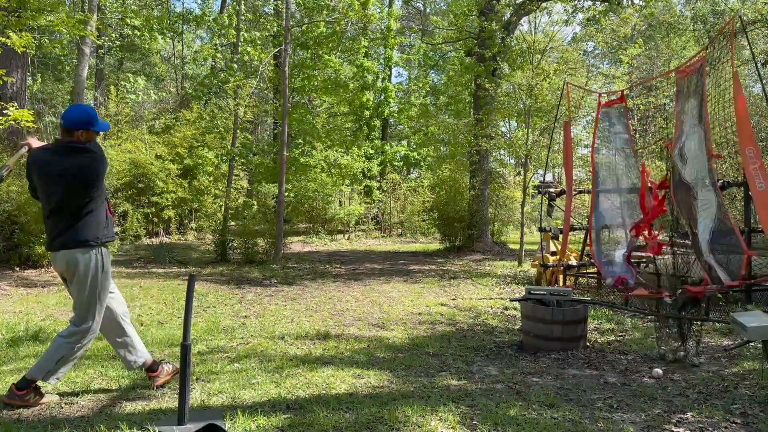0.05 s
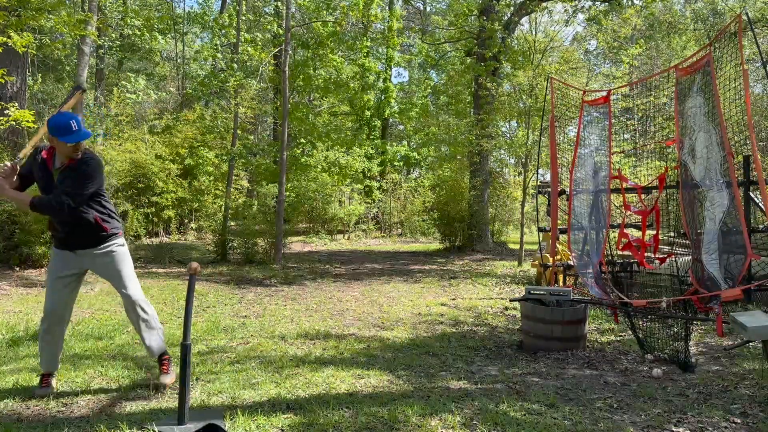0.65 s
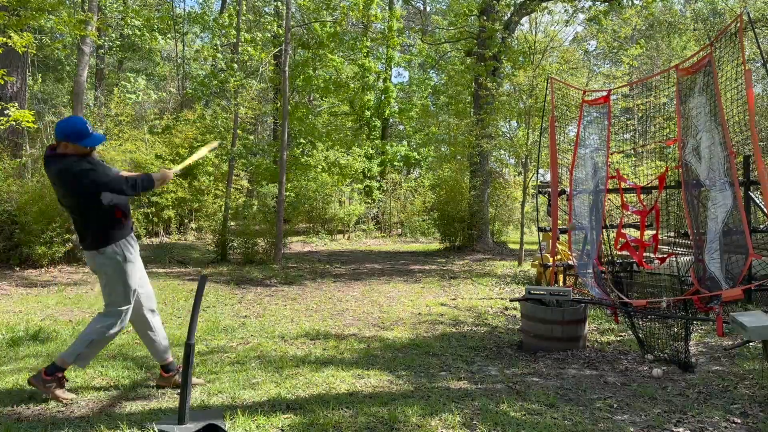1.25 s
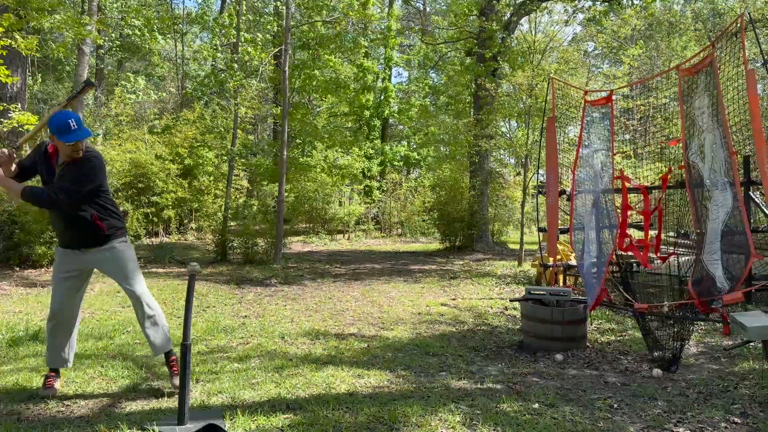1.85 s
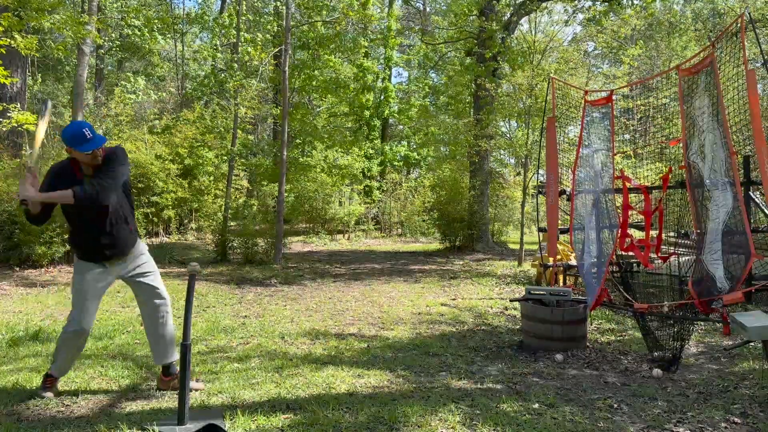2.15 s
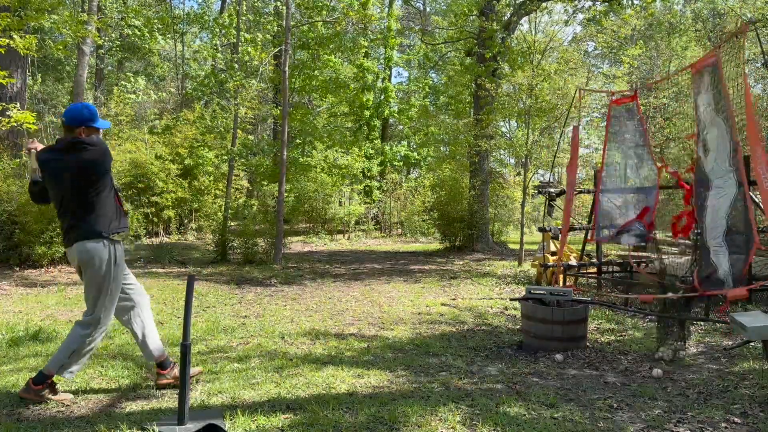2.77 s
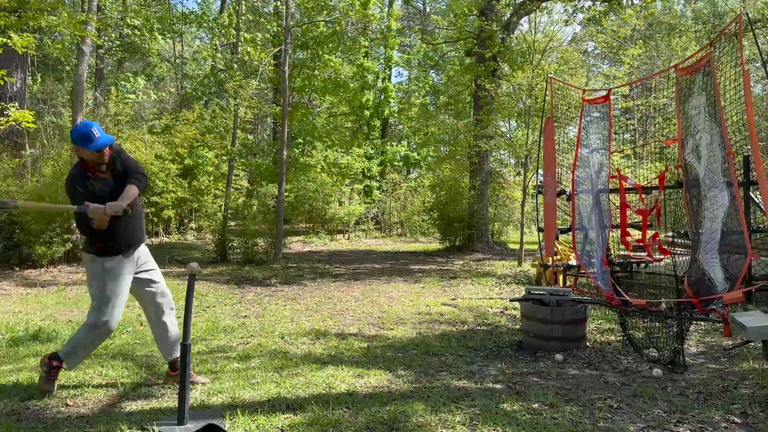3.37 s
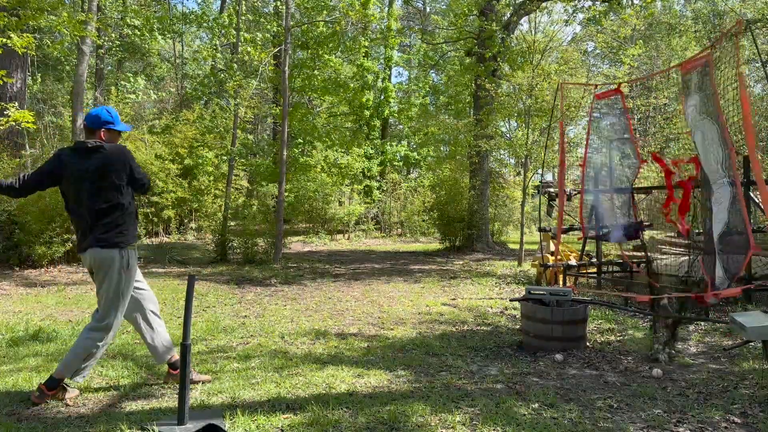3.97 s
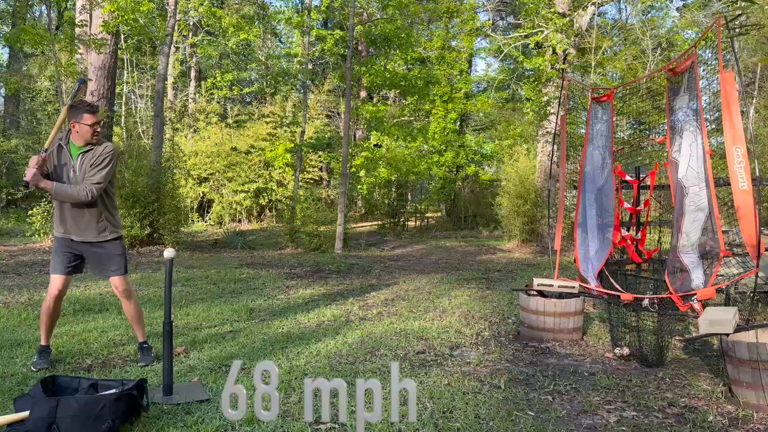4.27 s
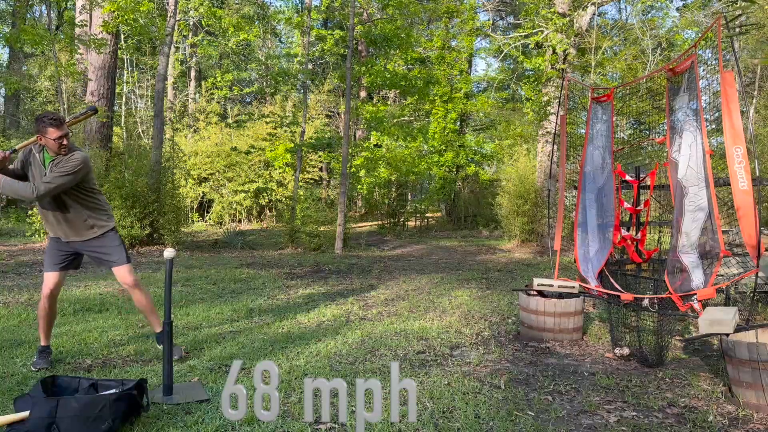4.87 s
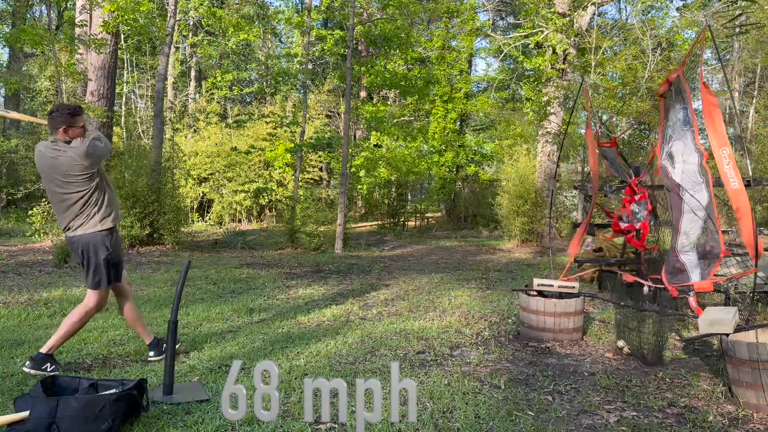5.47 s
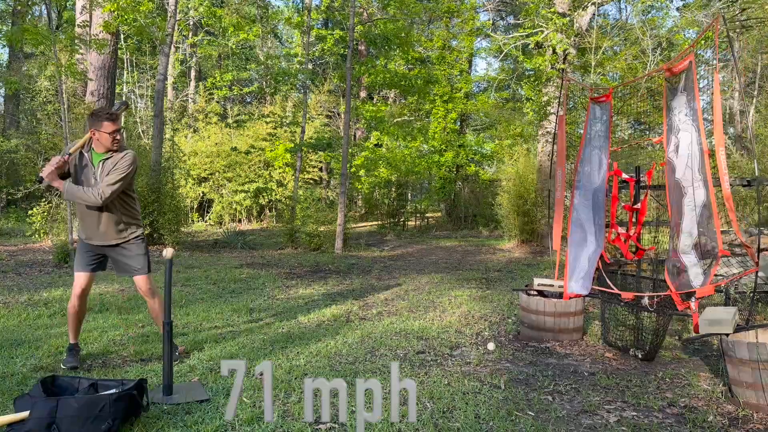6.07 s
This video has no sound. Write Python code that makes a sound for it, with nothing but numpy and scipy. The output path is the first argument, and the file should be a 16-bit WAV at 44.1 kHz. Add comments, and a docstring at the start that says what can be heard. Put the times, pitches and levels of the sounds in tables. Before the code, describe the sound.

Four sharp cracks of bat on baseball echo among trees, each followed by a net thudding, billowing and clattering.

```python
"""A practice net flaps and rattles, then a bat cracks four baseballs off a tee into it. Each hit is a click,
the knock of the squashed ball and a short ring of the bat, thrown back by lawn, trunks and leaves. The net
snaps tight, thuds and billows, and its frame clatters. Underneath are the batter's movements and a light
breeze. From about 4.2 seconds the scene changes: the echoes differ, the net's cloth hums, the low rumble
beneath is louder and a small bird whistles."""
import sys
import numpy as np
from scipy import signal
from scipy.fft import rfft, irfft, next_fast_len
from scipy.io import wavfile
from scipy.ndimage import map_coordinates

SR = 44100
rng = np.random.default_rng(int(sys.argv[2]) if len(sys.argv) > 2 else 0)


def persist_wave(psi):
    """Save psi, clipped to +-1, as 16-bit WAV."""
    counts = np.round(np.clip(psi, -1, 1) * 32767).astype(np.int16)
    wavfile.write(sys.argv[1], SR, np.atleast_2d(counts).T)


N = 274302
CHANGE_S, TREBLE_DROP_S = 4.206, 5.925  # when echoes, cloth and rumble change; when the background's treble drops

# Bat meets ball. Each row: start in seconds, click level in dB, click tilt in dB per octave, knock level
# in dB, knock tilt in dB per octave, ring level in dB, ring pitch multiplier, echo level in dB, extra
# bite in dB, band sent toward the trees in Hz, its boost in dB. Levels in all tables are relative.
HITS = [(1.1853, -4.5, 7, -3, 3.5, -4.5, 0.92, 2.5, -0.5, 2410, 6),
        (2.3091, -3.5, 4.5, -1.5, 2.5, -3, 0.96, 3.5, 1, 1885, -0.5),
        (3.4556, -5, 4, 0.5, 2, -6.5, 0.95, 2, 1.4, 1970, 6),
        (5.2886, -9, 13.5, -6.5, -1.3, -1, 0.87, 2.5, 12.5, 2000, -5)]
# The tone of the click and of the knock. Each row: frequency in Hz, level in dB.
CLICK_TONE = [(500, -29), (2500, -13), (4500, -0.5), (6300, -6.5), (8800, 5), (11000, -1), (13000, -4.5),
              (16000, -16)]
KNOCK_TONE = [(100, -35.5), (250, -15.5), (430, 3.5), (750, -3.5), (1000, 3.5), (1400, -8), (2000, -14.5),
              (2500, -17.5), (3200, -18), (4200, -24), (7500, -23.5), (16000, -57.5)]
# The notes the bat rings with. Each row: pitch in Hz, level in dB, fade time in seconds.
BAT_NOTES = [(914, -10.5, 0.018), (1214, -34, 0.037), (1746, -27, 0.038), (1920, -37.5, 0.074),
             (2630, -32, 0.046), (3060, -25.5, 0.0092), (3520, -34, 0.018)]
# Knock and ring lean to the left. Each row: frequency in Hz, how much louder the left is in dB.
KNOCK_LEAN = [(400, -0.5), (900, 8.5), (4000, 18.5)]
def bat_cracks(size=32768, click_db=9, knock_db=21.5, foliage_db=-34, squash_s=0.00072, lawn_s=0.00151):
    """The contact clicks, the squashed ball knocks and the bat rings; lawn and woods repeat it."""
    out = np.zeros((2, N))
    t, hz = np.arange(size) / SR, np.fft.rfftfreq(size, 1 / SR)
    # The knock reaches the left side first, the click the right side.
    knock_sides = delay(hz, np.array([[0], [4 / SR]])) * amp(curve(KNOCK_LEAN, hz) * [[.5], [-.5]])
    click_sides = delay(hz, np.array([[3.6 / SR], [0]])) * pan(0.88)
    click_octaves = np.log2(np.clip(hz / 9000, .5, 2))
    knock_octaves = np.log2(np.clip(hz / 800, .5, 5))
    lawn = 1 + .85 * delay(hz, lawn_s) / (1 + (hz / 2600) ** 2)  # grass returns only the lower part
    early_trunks, late_trunks = trunk_echoes(EARLY_TRUNKS, size), trunk_echoes(LATE_TRUNKS, size)
    fade_out = np.minimum(1, 20 * (t[-1] - t))
    for (start, click_level, click_tilt, knock_level, knock_tilt, ring_db, ring_pitch,
         echo_db, bite_db, beam_hz, beam_db) in HITS:
        click = amp(click_db + click_level) * pulse(curve(CLICK_TONE, hz) + click_tilt * click_octaves)
        knock = amp(knock_db + knock_level) * pulse(curve(KNOCK_TONE, hz) + knock_tilt * knock_octaves)
        ring = sum(amp(ring_db + db + rng.normal(0, 1)) * note(t, ring_pitch * pitch, fade_s)
                   for pitch, db, fade_s in BAT_NOTES)
        body = (knock * lawn + rfft(ring)) * delay(hz, squash_s)
        direct = body * knock_sides + click * click_sides
        trunks = early_trunks if start < CHANGE_S else late_trunks
        echoes = (body + click) * trunks + amp(foliage_db) * rfft(foliage(size))
        # The bat beams one band toward the trees, depending on where the ball meets it.
        beam = pulse(echo_db + beam_db * band(hz, beam_hz, octaves=0.45))
        bite = pulse(bite_db * band(hz, 5700, octaves=0.73))  # the edge of a hard contact
        add(out, start, irfft(direct * bite + beam * echoes) * fade_out)
    return out


# Trunks and yard gear that echo a crack, before and after CHANGE_S. Each row: delay in seconds,
# level in dB, how much louder the left is in dB, the frequency returned best in Hz.
EARLY_TRUNKS = [(.0045, -19, -2, 900), (0.0142, -17.5, 1, 2290), (0.0172, -19.5, -3, 2400),
                (0.025, -23, -4, 1000), (0.0332, -19, 4.5, 4800), (.0585, -25, -3, 2600),
                (.0598, -23, 3, 4900), (.0893, -20.5, 0, 2000)]
LATE_TRUNKS = [(.0055, -13, -6, 950), (.0105, -15, 4, 950), (.0125, -13, 4, 5140), (.0155, -11.5, 1, 2800),
               (.0565, -17, -3, 2800), (.09, -20, 0, 2400)]
# The tone all these echoes share. Each row: frequency in Hz, level in dB.
ECHO_TONE = [(200, -19), (600, -8.5), (900, 0), (1300, -0.5), (2200, 4), (3500, 1.5), (5000, 8),
             (7000, -21), (16000, -29.5)]
def trunk_echoes(trunks, size, smear_s=0.0008, roughness=0.85, lead_s_per_db=5e-5):
    """Each trunk returns a slap, smeared by rough bark, that reaches the louder side first."""
    t, hz = np.arange(size) / SR, np.fft.rfftfreq(size, 1 / SR)
    echoes = 0
    for delay_s, db, left_db, best_hz in trunks:
        smear = rng.standard_normal(size) * np.exp(-t / smear_s)
        slap = (1 + roughness * rfft(smear / np.linalg.norm(smear))) / np.hypot(1, roughness)
        colour = pulse(9 * (band(hz, best_hz, octaves=0.37) - .5))
        arrival_s = delay_s + lead_s_per_db * left_db * np.array([[-.5], [.5]])
        echoes += amp(db) * slap * colour * delay(hz, arrival_s) * pan(left_db)
    return echoes * amp(curve(ECHO_TONE, hz))


# The tone of a crack scattered by leaves. Each row: frequency in Hz, level in dB.
FOLIAGE_TONE = [(100, 10), (420, -1.5), (900, -2), (1400, -1.5), (2200, -1.5), (3600, -8.5), (4900, -7.5),
                (6500, -11.5), (9500, -6.5), (12000, -18), (16000, -26.5)]
# How long it lingers. Each row: frequency in Hz, fade time in seconds.
FOLIAGE_FADE = [(200, 0.29), (1000, 0.78), (3000, 0.78), (9000, 0.31), (15000, 0.7)]
def foliage(size, rise_s=0.00047):
    """Countless leaves and twigs scatter a crack into a grainy tail."""
    likeness = [(300, 0.54), (1200, 0.1), (5000, 0.1), (9000, 0.41)]
    scatter = noise(FOLIAGE_TONE, grain_db=3, likeness=likeness)[:, :size]
    hz, t, bands = signal.stft(scatter, SR, nperseg=256)
    envelope = (1 - np.exp(-t / rise_s)) * fade(t, curve(FOLIAGE_FADE, hz)[:, None])
    return signal.istft(bands * envelope, SR, nperseg=256)[1][:, :size]


# The ball lands in the net. Each row: start in seconds, levels in dB of snap, slap, hiss, rustle and
# thud, the thud's delay in seconds, its first pitch in Hz, its rise and glide times in seconds.
CATCHES = [(1.2952, -20.5, -26, -31.5, -54, -18, .0071, 100, .0114, .034),
           (2.428, -18.5, -23.5, -32.5, -48, -17, .0011, 185, .0122, .026),
           (3.5796, -22, -24.5, -32.5, -56, -18.5, .0093, 182, .0065, .0205),
           (5.4129, -23, -27, -33.5, -47.5, -14.5, .0081, 180, .0048, .0075)]
# The tone of the snapping net, slapped cloth and rubbing cords. Each row: frequency in Hz, level in dB.
SNAP_TONE = [(150, -2), (600, 7), (1600, 4), (3000, 2), (6500, -15), (9500, 1.5), (12000, -8),
             (16000, -20.5)]
SLAP_TONE = [(80, 8), (200, 13.5), (400, 1), (800, -2), (1500, -7), (2500, -12), (5000, -17), (9000, -68)]
MESH_TONE = [(1000, 9), (3000, 1.5), (4900, 1.5), (6800, -2), (8300, -2.5), (9500, 6.5), (10600, 3.5),
             (12000, -8), (16000, -10)]
def net_catches(slap_lag_s=0.0046, sag_hz=43.8):
    """The ball snaps the net tight and slaps its cloth; cords zip, and a thud sinks as the net gives."""
    snap, slap, hiss = np.zeros((3, N))
    thud = np.zeros((2, N))
    for start, snap_db, slap_db, hiss_db, _, thud_db, lag_s, thud_hz, rise_s, glide_s in CATCHES:
        snap += amp(snap_db) * burst(start, rise_s=0.00075, fade_s=0.038)
        slap += amp(slap_db) * burst(start + slap_lag_s, rise_s=0.00085, fade_s=0.24)
        hiss += amp(hiss_db) * burst(start, rise_s=0.00055, fade_s=0.26)
        add(thud, start + lag_s, air_push(thud_db, sag_hz, rise_s, thud_hz / sag_hz, glide_s))
    return (thud + snap * noise(SNAP_TONE, grain_db=2.5)
            + slap * noise(SLAP_TONE, grain_db=1.5) * pan(0.44)
            + hiss * noise(MESH_TONE, grain_db=1.5) * pan(2.6))


def air_push(db, end_hz, rise_s, start_ratio=1, glide_s=0.011):
    """A push of air is a few low waves; a start_ratio above 1 makes the pitch sink as motion slows."""
    t = np.arange(SR // 4) / SR
    pitch = end_hz * (1 + (start_ratio - 1) * np.exp(-t / glide_s))
    swell = (t / rise_s * np.exp(1 - t / rise_s)) ** 1.5
    return amp(db) * swell * sine(pitch) * pan(2.7)


# The net swings out and back. Each row: start and hold time in seconds, cloth and frame levels in dB.
BILLOWS = [(0.0, 0.0057, -28, -39), (0.115, 0.037, -42.5, -51), (1.345, 0.028, -31.5, -36.5),
           (1.49, 0.13, -41.5, -50.5), (2.465, 0.013, -27, -34), (2.508, 0.089, -39.5, -49),
           (2.649, 0.058, -32.5, -44), (3.637, 0.068, -32.5, -44), (3.794, 0.064, -30.5, -39.5),
           (3.917, 0.12, -55.5, -61.5), (4.138, 0.057, -46.5, -64), (5.471, 0.039, -36, -48),
           (5.676, 0.032, -34, -50), (5.782, 0.1, -43, -64)]
# The tone of loose cloth, tight cloth and the net's frame. Each row: frequency in Hz, level in dB.
LOOSE_CLOTH_TONE = [(53, -5), (90, -7.5), (108, -9.5), (167, 3.5), (222, 1), (275, -4.5), (330, -4.5),
                    (468, -11.5), (570, -30), (700, -15), (910, -28), (1540, -120)]
TIGHT_CLOTH_TONE = [(50, -40), (120, -13), (190, 11), (280, -4), (400, -12.5), (800, -61)]
FRAME_TONE = [(300, 5), (500, 7.5), (850, 6), (1300, 0.5), (2000, -2.5), (3000, -17), (5000, -27.5)]
def net_billows(hum_hz=200):
    """Cloth flutters, the frame chatters and the mesh rustles; from CHANGE_S tighter cloth hums."""
    flapping = sum(amp(db) * billow(start, hold_s, fade_s=0.39) for start, hold_s, db, _ in BILLOWS)
    shaking = sum(amp(db) * billow(start, hold_s, fade_s=0.34) for start, hold_s, _, db in BILLOWS)
    settling = sum(amp(db) * billow(start, 0, fade_s=1.27) for start, _, _, _, db, *_ in CATCHES)
    loose = noise(LOOSE_CLOTH_TONE)
    hum = sine(hum_hz * (1 + 0.0293 * wobble(23)))
    tight = unit(noise(TIGHT_CLOTH_TONE) + amp(-1) * hum)
    cloth = flapping * np.where(clock() < CHANGE_S, loose, tight) * pan(2.3)
    frame = amp(-3) * shaking * noise(FRAME_TONE, grain_db=2) * pan(-1.7)
    rubbing = amp(-44) * np.sqrt(flapping) + amp(-3) * settling
    rustle = amp(1.6 * wobble(60)) * noise(MESH_TONE, grain_db=-1)
    mesh = rubbing * (rustle + amp(-9) * cord_clicks()) * pan(1)
    return cloth + frame + mesh


def billow(start, hold_s, fade_s, rise_s=0.004):
    """The loudness of one swing of the net: it fills, holds and dies away."""
    out, t = np.zeros((1, N)), clock()
    envelope = (1 - np.exp(-t / rise_s)) * fade(np.maximum(t - hold_s, 0), fade_s)
    add(out, start, envelope[None])
    return out[0]


# The tone of clicking cords. Each row: frequency in Hz, level in dB.
CORD_TONE = [(700, -14), (1500, 9), (3000, -5), (4800, -8), (7000, -5), (10000, -4), (13000, -2),
             (16000, -15)]
def cord_clicks(count=500, spread_db=5, fade_s=0.012):
    """Cords and clips click against each other at random moments."""
    moments = rng.uniform(0, N - 1, count).astype(int)
    strengths = amp(spread_db * rng.standard_normal(count).clip(-2, 2))
    one_click = fade(np.arange(SR // 10) / SR, fade_s)
    clicks = signal.fftconvolve(np.bincount(moments, strengths, N), one_click)[:N]
    return unit(clicks * noise(CORD_TONE))


# Knocks of the frame. Each row: start in seconds, knock level in dB, ring level in dB, ring pitch in Hz.
RATTLES = [(0.128, -54, -48, 780), (0.137, -41.5, -33, 428), (1.372, -35, -29, 405), (1.536, -45, -46, 783),
           (1.592, -40.5, -43, 835), (2.465, -28, -27, 1090), (2.483, -31, -41, 640),
           (2.569, -34.5, -30, 442), (2.636, -33, -39, 807), (2.664, -27, -31, 919),
           (3.654, -31.5, -39, 1010), (3.791, -34.5, -38, 937), (3.822, -29.5, -44, 495),
           (5.435, -34, -37, 773), (5.478, -42, -54, 820), (5.488, -29.5, -40, 450), (5.497, -43, -39, 420),
           (5.515, -52, -42, 2870), (5.56, -43.5, -52, 970), (5.683, -49, -40, 793),
           (5.77, -44.5, -56, 700)]
# The notes of a fitting. Each row: multiple of the ring pitch, level in dB, fade time in seconds.
FITTING_NOTES = [(1, -3, 0.096), (1.62, -14.5, 0.041)]
# Ticks of twigs and cords. Each row: start in seconds, level in dB.
TICKS = [(2.188, -37), (2.218, -37.5), (2.569, -24.5), (3.347, -30), (5.614, -31)]
def clatter(knock_db=-1, tick_db=-10):
    """The frame knocks hollowly and its fittings ring; twigs and cords give dry ticks."""
    rings, t = np.zeros((2, N)), np.arange(SR // 4) / SR
    for start, _, ring_db, hz in RATTLES:
        ring = sum(amp(ring_db + db) * note(t, ratio * hz, fade_s) for ratio, db, fade_s in FITTING_NOTES)
        add(rings, start, ring[None])
    knocks = sum(amp(db + knock_db) * burst(start, 0.0005, fade_s=0.064) for start, db, *_ in RATTLES)
    ticks = sum(amp(db + tick_db) * burst(start, 0.00093, fade_s=0.019) for start, db in TICKS)
    return knocks * noise(FRAME_TONE) + rings + ticks * noise(MESH_TONE)


# The bat sweeps past just before a hit. Each row: start in seconds, push and whoosh levels in dB.
SWINGS = [(1.152, -33, -43.5), (2.281, -28.5, -47), (3.428, -27, -40), (5.26, -40, -45.5)]
# The tone of the whoosh. Each row: frequency in Hz, level in dB.
WHOOSH_TONE = [(80, 0), (180, -6), (400, -8), (700, -7.5), (1500, -20.5), (4000, -36)]
def bat_swings(peak_s=0.022, width_s=0.016):
    """The bat shoves and stirs the air on its way to the ball."""
    pushes, whoosh = np.zeros((2, N)), np.zeros(N)
    for start, push_db, whoosh_db in SWINGS:
        add(pushes, start, air_push(push_db, end_hz=72, rise_s=0.021))
        whoosh += amp(whoosh_db) * np.exp(-((clock() - start - peak_s) / width_s) ** 2)
    return pushes + whoosh * noise(WHOOSH_TONE) * pan(2.2)


# The batter's steps. Each row: start in seconds, level in dB.
STEPS = [(3.271, -33.5), (4.011, -29.5)]
def footsteps():
    """A foot lands on the lawn with a low thud."""
    out = np.zeros((2, N))
    for start, db in STEPS:
        add(out, start, air_push(db, end_hz=54.6, rise_s=0.011, start_ratio=1.67))
    return out


# The tone of rustling clothes. Each row: frequency in Hz, level in dB.
CLOTHES_TONE = [(1500, 4.5), (4000, -1.5), (7000, -3), (10000, -0.5), (15000, -9.5)]
def clothes_rustle(level_db=-61, wind_up_s=0.17, flick_db=2):
    """The batter's clothes rustle in little flicks, most of all as he turns into the ball."""
    effort = sum(np.exp(-np.abs(clock() - start) / wind_up_s) for start, *_ in HITS)
    return amp(level_db + flick_db * wobble(76)) * effort * noise(CLOTHES_TONE, grain_db=1.5)


# Cords, straps and shoes scrape. Each row: start in seconds, length in seconds, level in dB.
SCRAPES = [(1.568, 0.015, -59.5), (2.083, 0.11, -64), (2.619, 0.02, -52.5), (2.676, 0.031, -52.5),
           (2.721, 0.023, -53), (3.957, 0.043, -55), (4.027, 0.065, -60.5), (5.052, 0.28, -71)]
# The tone of a scrape. Each row: frequency in Hz, level in dB.
SCRAPE_TONE = [(2500, -12), (4800, 0.5), (6800, 7), (8300, 0), (10000, 10), (13000, -9), (16000, -3)]
def scrapes():
    """Each scrape is many tiny slips, swelling and fading."""
    strokes = sum(amp(db) * np.sin(np.pi * np.clip((clock() - start) / length, 0, 1))
                  for start, length, db in SCRAPES)
    return strokes * noise(SCRAPE_TONE, grain_db=3.5)


# A small bird's calls. Each row: start and length in seconds, first and last pitch in Hz, level in dB.
WHISTLES = [(4.28, 0.052, 9700, 7600, -71), (4.746, 0.12, 9240, 7540, -65.5),
            (4.934, 0.043, 8640, 7350, -61), (6.188, 0.055, 8250, 7630, -71)]
def bird(echo_db=-4, fade_s=0.39, waver=0.004):
    """Thin whistles drop fast, level off and linger among the trees."""
    out = np.zeros((2, N))
    for start, length, first_hz, last_hz, db in WHISTLES:
        progress = np.linspace(0, 1, round(length * SR))
        pitch = last_hz + (first_hz - last_hz) * (1 - progress) ** 1.7
        pitch *= 1 + waver * wobble(402)[:len(progress)]
        add(out, start, amp(db) * np.sin(np.pi * progress ** 1.44) * sine(pitch) * pan(0))
    tail = rng.standard_normal((2, SR // 2)) * fade(np.arange(SR // 2) / SR, fade_s)
    echo = signal.fftconvolve(out, tail / np.linalg.norm(tail[0]), axes=1)[:, :N]
    return out + amp(echo_db) * echo


# The tone of the background before and after CHANGE_S. Each row: frequency in Hz, level in dB.
EARLY_AIR_TONE = [(15, -49.5), (25, -21.5), (40, -16.5), (63, -4.5), (153, -15), (249, -20.5), (277, -20),
                  (326, -21.5), (405, -21), (503, -20), (1480, -31.5), (2350, -36), (5430, -45.5),
                  (9570, -45.5), (16000, -58)]
LATE_AIR_TONE = [(15, -54), (25, -46), (52, -5), (76, -3), (114, -7), (141, -19), (293, -27), (317, -32),
                 (405, -28), (714, -30.5), (1130, -37), (1520, -38), (1790, -41), (5880, -46), (16000, -73)]
# How wide it sounds. Each row: frequency in Hz, how alike left and right are (1 means the same).
AIR_LIKENESS = [(60, 1), (180, 0.91), (550, 0.13), (1650, 0.058), (4970, -0.078), (15000, 0.67)]
def rumble_and_breeze(early_db=-55, late_db=-46.5, drop_db=-5):
    """A distant rumble, louder from CHANGE_S, and a breeze in the leaves whose treble drops around 5 kHz from
    TREBLE_DROP_S."""
    early = amp(early_db) * noise(EARLY_AIR_TONE, likeness=AIR_LIKENESS)
    late = amp(late_db) * noise(LATE_AIR_TONE, likeness=AIR_LIKENESS)
    duller = filtered(late, lambda hz: amp(drop_db * band(hz, 5000, octaves=1)))
    late = np.where(clock() < TREBLE_DROP_S, late, duller)
    blend = np.clip((clock() - CHANGE_S) / .01, 0, 1)
    return ((1 - blend) * early + blend * late) * amp(0.59 * wobble(2.9)) * pan(1.4)


# How wide nearby noises sound. Each row: frequency in Hz, how alike left and right are.
NEAR_LIKENESS = [(300, 0.96), (650, 0.38), (1500, 0.12), (4000, 0.045), (9000, 0.82)]
def noise(tone, grain_db=0, likeness=NEAR_LIKENESS):
    """Stereo noise with the given tone; grain_db breaks it into small random bursts."""
    def shape(hz):
        angle = np.arccos(np.clip(curve(likeness, hz), -1, 1)) / 2
        return amp(curve(tone, hz)) * [np.cos(angle), np.sin(angle)]
    grains = rng.standard_normal((2, N)) * amp(grain_db * wobble(700))
    mid, side = filtered(grains, shape)
    return unit(np.array([mid + side, mid - side]))


# Moments when lingering sounds stop short. Each entry: time in seconds.
STOPS = [.272, 1.655, 2.852, 4.206, 5.925]
def add(track, start, sound):
    """Mix a sound in at start seconds; it lasts until the next stop at most."""
    first = round(start * SR)
    last = min([round(stop * SR) for stop in STOPS if stop > start] + [N, first + sound.shape[-1]])
    track[:, first:last] += sound[:, :last - first]


def amp(db):
    """Turn decibels into a multiplier."""
    return 10 ** (np.asarray(db) / 20)


def unit(x):
    """Scale to an average (rms) level of 1."""
    return x / np.sqrt(np.mean(x ** 2) + 1e-20)


def pan(left_db):
    """Left and right gains that make the left louder by left_db."""
    return amp([[left_db / 2], [-left_db / 2]])


def clock():
    """The time of every sample in seconds."""
    return np.arange(N) / SR


def fade(t, fade_s):
    """Die away by 60 dB in fade_s seconds: the fade time."""
    return amp(-60 * t / fade_s)


def burst(start, rise_s, fade_s):
    """A loudness curve that rises at start and dies away."""
    t = np.maximum(clock() - start, 0)
    return (1 - np.exp(-t / rise_s)) * fade(t, fade_s)


def note(t, hz, fade_s):
    """One fading pitch."""
    return fade(t, fade_s) * np.sin(2 * np.pi * hz * t)


def sine(pitch):
    """A pure tone that follows a changing pitch in Hz."""
    return np.sin(2 * np.pi * np.cumsum(pitch) / SR)


def wobble(rate):
    """A smooth random curve through rate points a second."""
    return map_coordinates(rng.standard_normal(int(N * rate / SR) + 4), [clock() * rate])


def curve(points, hz):
    """Read between a table's rows, giving each octave equal room."""
    frequencies, values = np.transpose(points)
    return np.interp(np.log(hz + 1), np.log(frequencies + 1), values)


def band(hz, centre_hz, octaves):
    """A bell-shaped bump of height 1 around centre_hz."""
    return np.exp(-(np.log2((hz + 1) / centre_hz) / octaves) ** 2)


def delay(hz, seconds):
    """Multiply a spectrum by this to make its sound arrive later."""
    return np.exp(-2j * np.pi * hz * seconds)


def pulse(db):
    """The spectrum of a sharply starting (minimum-phase) pulse with these levels."""
    cepstrum = irfft(np.log(amp(db)))
    half = len(cepstrum) // 2
    return np.exp(rfft(np.r_[cepstrum[0], 2 * cepstrum[1:half], np.zeros(half)]))


def filtered(x, response):
    """Scale each frequency in x by response(hz)."""
    size = x.shape[-1]
    padded = next_fast_len(size + 8192)
    return irfft(rfft(x, padded) * response(np.fft.rfftfreq(padded, 1 / SR)), padded)[..., :size]


def scene():
    """Batter and net, with woods all round."""
    batter = bat_cracks() + clothes_rustle() + bat_swings() + footsteps()
    net = net_catches() + net_billows() + clatter()
    return batter + net + scrapes() + bird() + rumble_and_breeze()


def record(dry, low_hz=36, top_hz=16300, ceiling=0.93):
    """Drop the deepest bass, round off the highest peaks and remove the very top treble."""
    lean = signal.sosfilt(signal.butter(2, low_hz, "highpass", fs=SR, output="sos"), dry)
    rounded = lean / (1 + np.abs(lean / ceiling) ** 4) ** (1 / 4)
    return filtered(rounded, lambda hz: 1 / (1 + (hz / top_hz) ** 120))


dry = scene()
out = record(dry)
persist_wave(out)
```